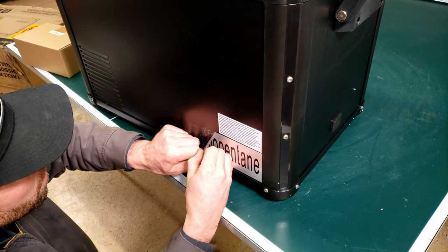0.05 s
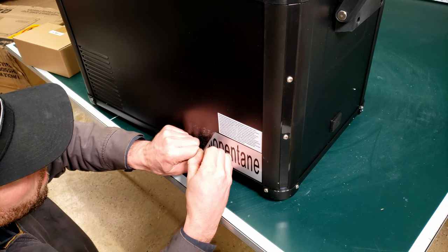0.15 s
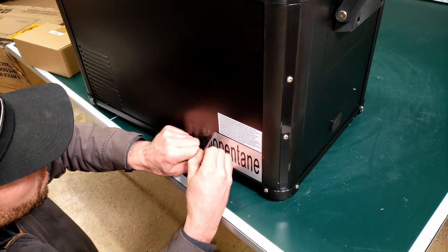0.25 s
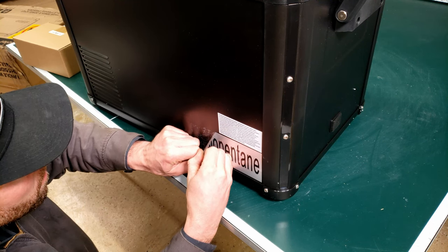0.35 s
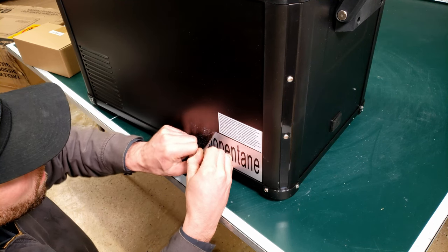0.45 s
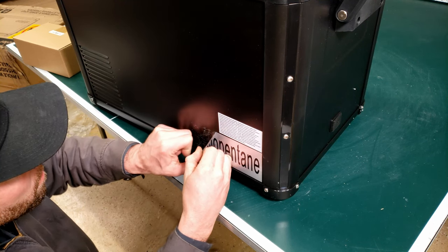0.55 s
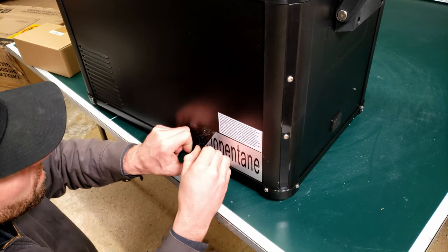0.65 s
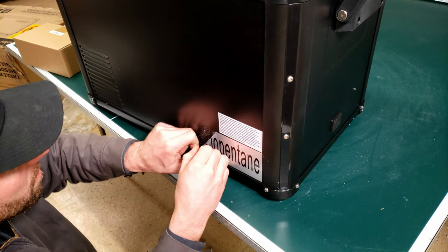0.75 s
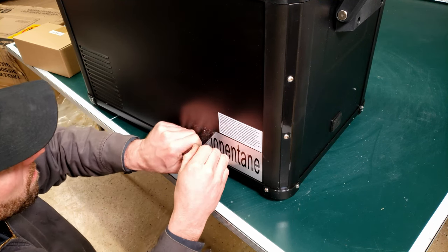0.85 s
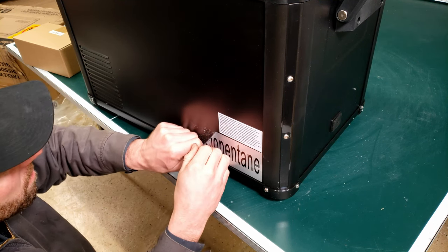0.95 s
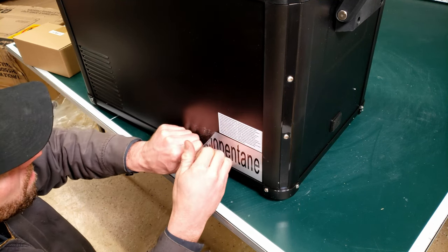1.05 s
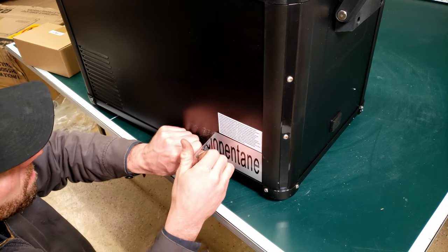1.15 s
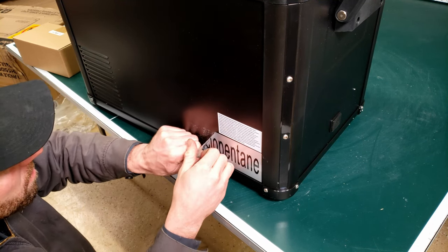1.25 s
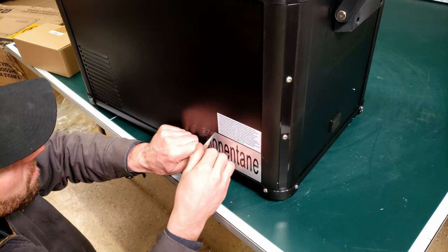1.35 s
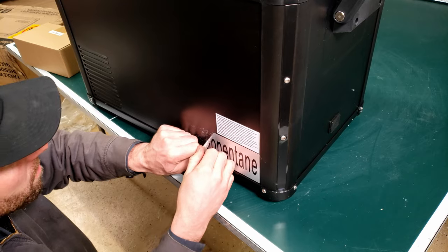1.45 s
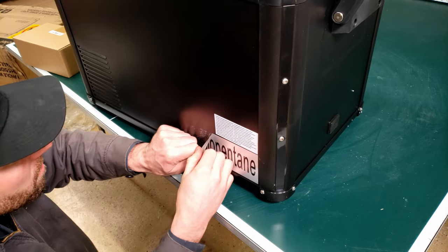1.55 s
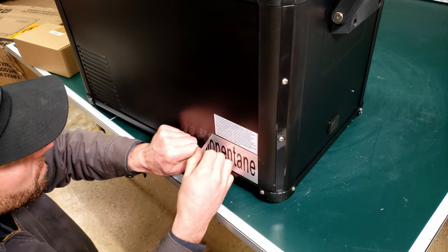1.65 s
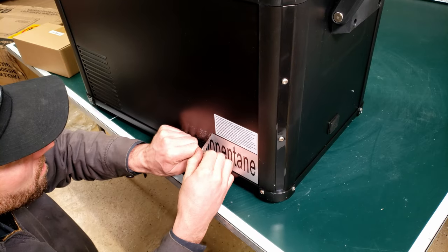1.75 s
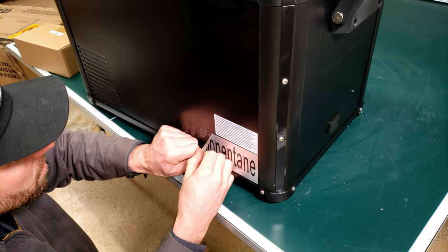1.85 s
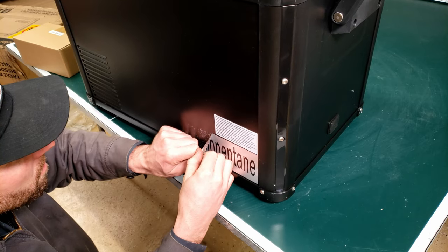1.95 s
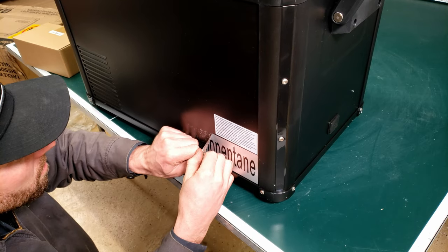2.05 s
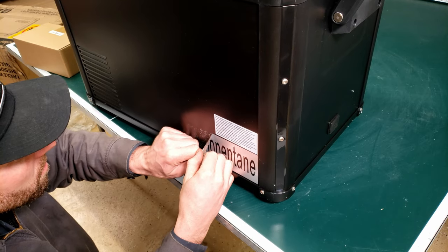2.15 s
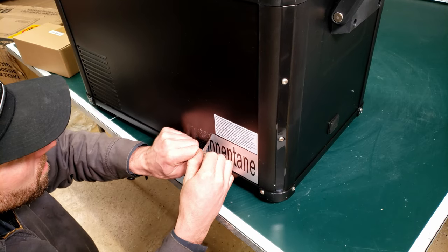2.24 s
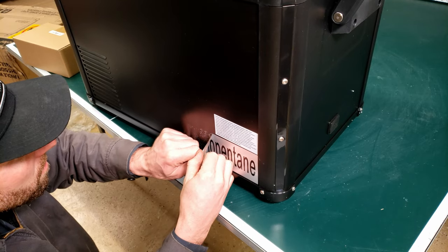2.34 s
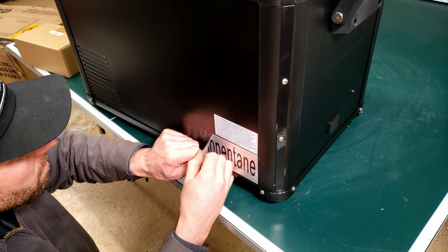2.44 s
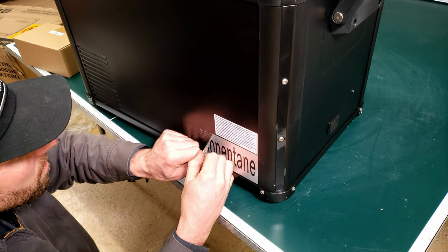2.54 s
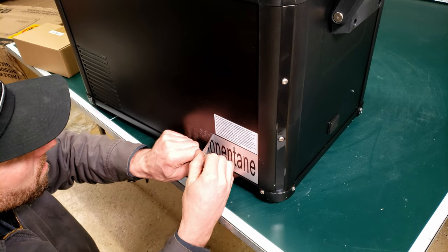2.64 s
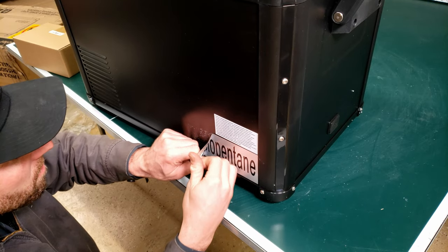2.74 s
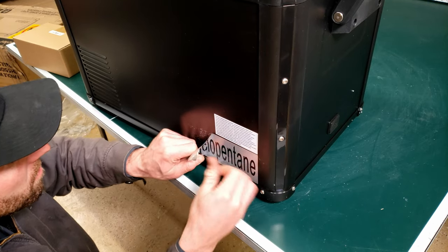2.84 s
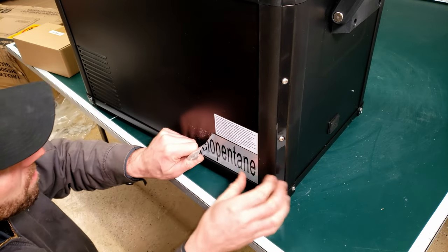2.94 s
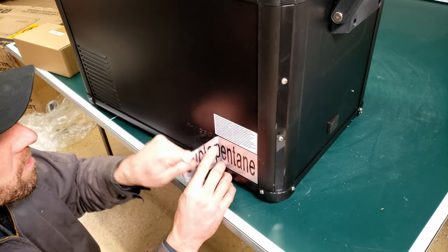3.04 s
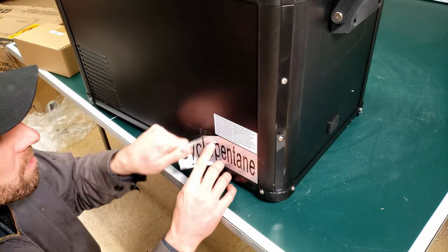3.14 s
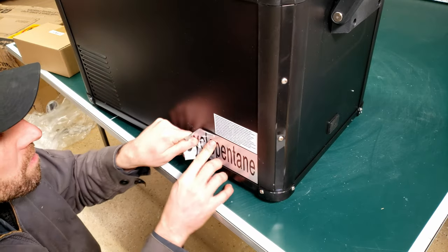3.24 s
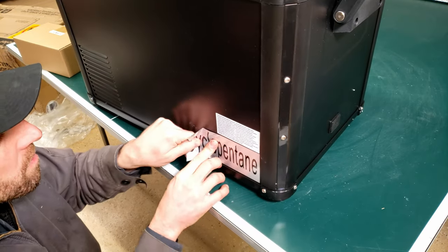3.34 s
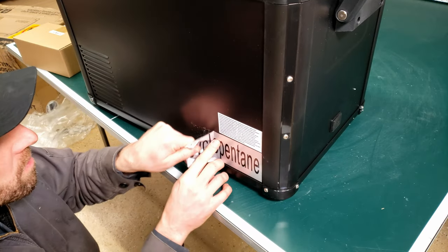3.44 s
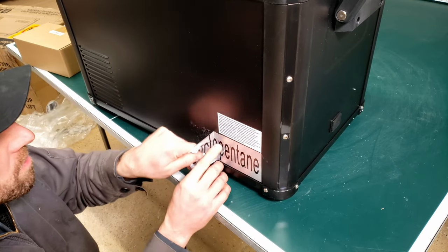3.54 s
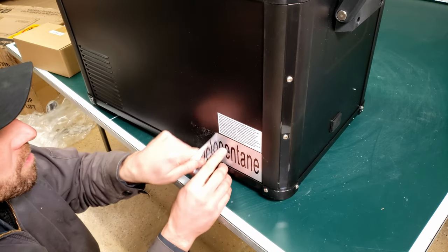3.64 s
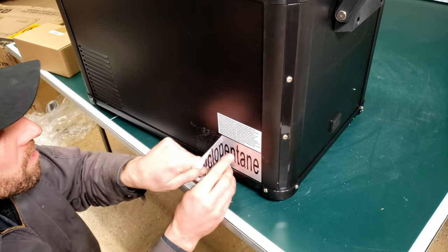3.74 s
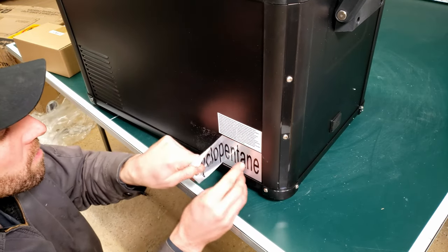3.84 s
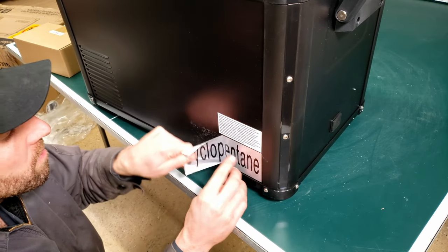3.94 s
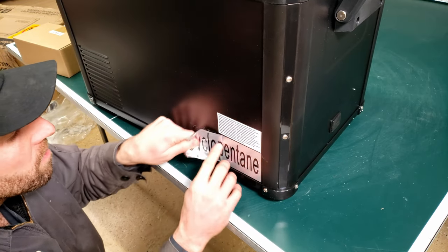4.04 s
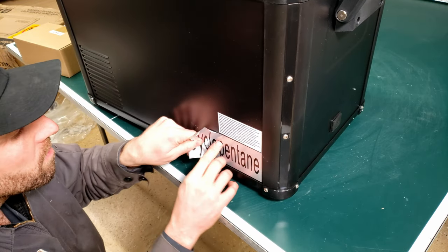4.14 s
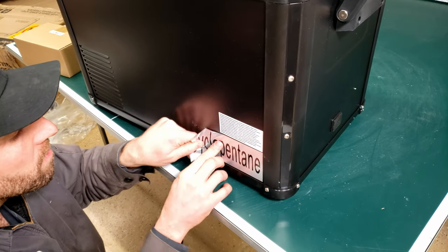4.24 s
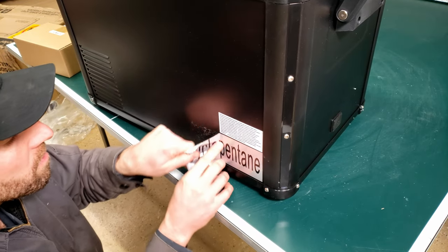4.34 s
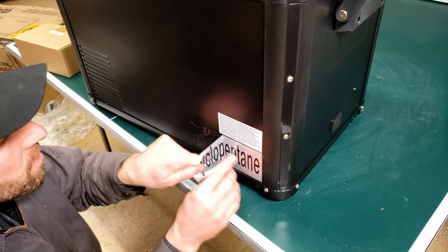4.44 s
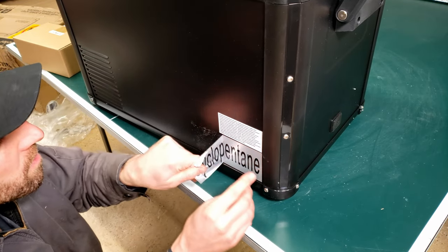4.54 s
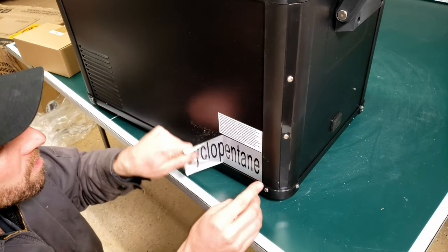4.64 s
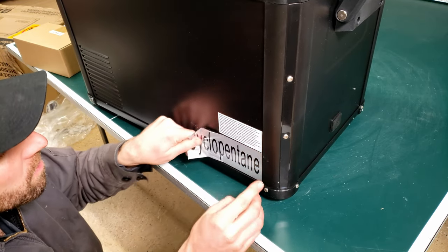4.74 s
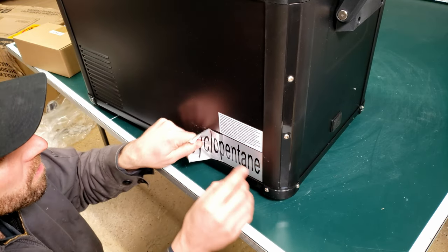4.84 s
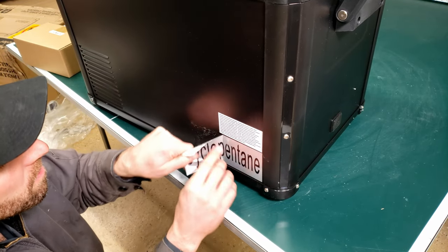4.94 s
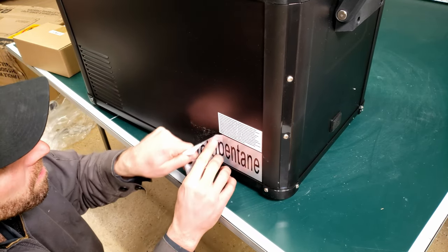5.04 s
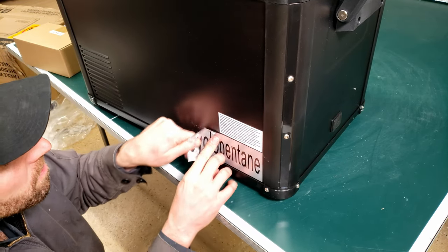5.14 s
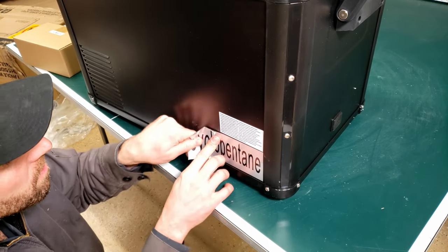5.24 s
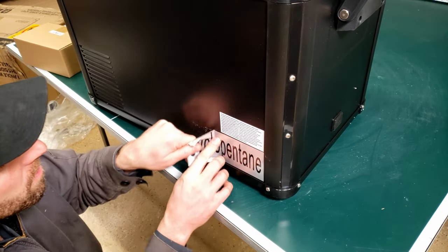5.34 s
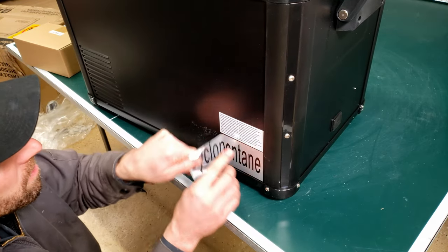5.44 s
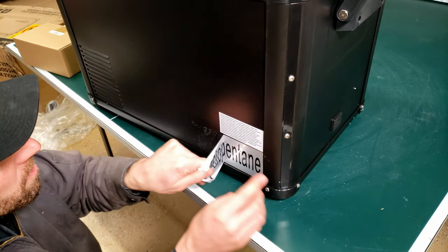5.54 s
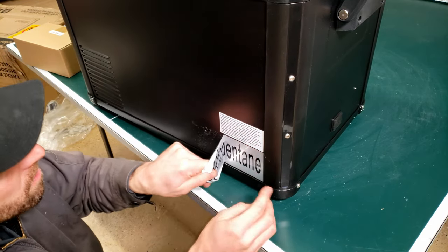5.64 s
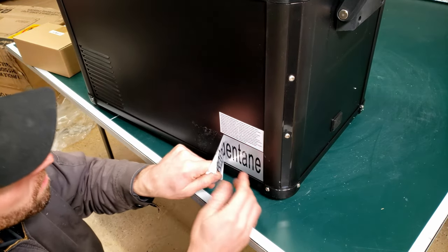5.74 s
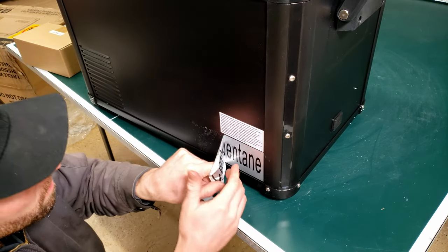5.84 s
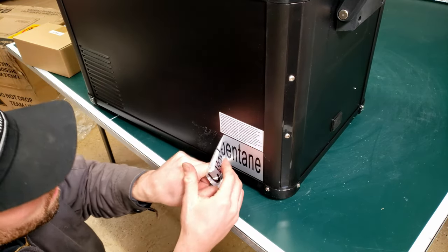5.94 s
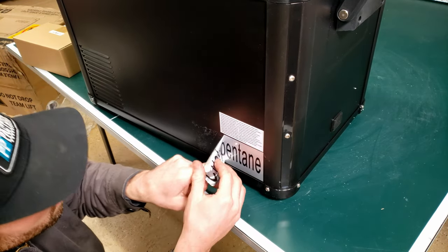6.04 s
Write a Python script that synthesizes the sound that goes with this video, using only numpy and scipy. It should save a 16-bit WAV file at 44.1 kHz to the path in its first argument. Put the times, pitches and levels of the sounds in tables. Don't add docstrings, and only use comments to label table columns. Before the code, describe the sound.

A plastic sticker is picked and torn off a small metal fridge in crackling snaps and short rips, with quiet gaps and faint hum.

```python
import sys
import numpy as np
from scipy import signal
from scipy.fft import rfft, irfft, next_fast_len
from scipy.io import wavfile

SR = 44100
rng = np.random.default_rng(int(sys.argv[2]) if len(sys.argv) > 2 else 0)


def natural_amplitude(level_db):
    exponent = np.asarray(level_db, float) / 20
    return 10 ** exponent


def wav_out(sig):
    wavfile.write(sys.argv[1], SR, np.round(np.clip(np.atleast_2d(sig).T, -1, 1) * 32767).astype(np.int16))


N = 268304


def rms_one(x):
    return x / np.sqrt(np.mean(x ** 2) + 1e-20)


def at_hz(points, hz):
    table_hz, values = np.array(points).T
    return np.interp(np.log(np.maximum(hz, 1)), np.log(table_hz), values)


def band(x, low_hz, high_hz):
    edges_hz = [low_hz, min(high_hz, .45 * SR)]
    return signal.sosfilt(signal.butter(2, edges_hz, "band", fs=SR, output="sos"), x)


def resonance(x, hz, width_hz):
    r = np.exp(-np.pi * width_hz / SR)
    poles = [1, -2 * r * np.cos(2 * np.pi * hz / SR), r * r]
    return signal.lfilter([(1 - r * r) / 2, 0, (r * r - 1) / 2], poles, x)


def shaped(x, gain):
    size = next_fast_len(x.shape[-1] + 4096)
    hz = np.arange(size // 2 + 1) * SR / size
    return irfft(rfft(x, size) * gain(hz), size)[..., :x.shape[-1]]


def drift(rate):
    r = np.exp(-2 * np.pi * rate / SR)
    return rms_one(signal.lfilter([1], [1, -2 * r, r * r], rng.standard_normal(N + SR))[SR:])


def stroke(start, rise, fall, rise_db, fall_db, in_s, out_s):
    t = np.arange(N) / SR - start
    on = np.clip(t / in_s, 0, 1) * np.clip((rise + fall - t) / out_s, 0, 1)
    span = on > 0
    on[span] *= natural_amplitude(np.interp(t[span], [0, rise, rise + fall], [-rise_db, 0, -fall_db]))
    return on, np.clip(t / (rise + fall), 0, 1)


def two_ports(length):
    # frequency in Hz, share common to both ports.
    likeness = [(300, 0.73), (2000, 0.85), (5000, 0.71), (12000, 0.3)]
    alike = lambda hz: np.clip(at_hz(likeness, hz), 0, 1)
    mid, side = rng.standard_normal((2, length))
    mid = shaped(mid, lambda hz: np.sqrt((1 + alike(hz)) / 2))
    side = shaped(side, lambda hz: np.sqrt((1 - alike(hz)) / 2))
    return np.array([mid + side, mid - side])


def breaks(per_s, spread_db, clump_db):
    born = rng.random(N) < per_s * natural_amplitude(clump_db * drift(60)) / SR
    return born * natural_amplitude(spread_db * np.minimum(rng.exponential(1, N), 4))


def grains(per_s, spread_db, clump_db, smooth_db):
    fade = np.exp(-1 / (0.00021 * SR))
    puffs = rms_one(signal.lfilter([1], [1, -fade], breaks(per_s, spread_db, clump_db) + 1e-18))
    return (puffs + natural_amplitude(smooth_db)) * two_ports(N)


def panel(x, ring_db):
    # frequency in Hz, width in Hz, level in dB.
    panel_modes = [(389, 14, -4), (480, 45, -0.5), (550, 52, -3), (615.7, 32, 5.5), (861, 79, -2),
                   (965, 38, 2.5), (1171, 34, -2), (1315, 55, 0), (1523, 69, -1), (1680, 45, 0.5)]
    pull = x.mean(axis=0)
    ring = 0
    for k, (hz, width_hz, db) in enumerate(panel_modes):
        ring = ring + (-1) ** k * natural_amplitude(db) * resonance(pull, hz, width_hz)
    return natural_amplitude(ring_db) * ring


def background():
    # frequency in Hz, rms level in dB.
    hum_lines = [
        (360.2, -73.5),
        (119, -88.5),
        (241, -92),
    ]
    # frequency in Hz, density in dB per Hz.
    rumble_density = [(20, -32), (40, -19.5), (65, -4), (110, -20), (170, -13), (250, -17.5), (500, -18.5),
                      (1000, -31.5), (2000, -35), (4000, -45)]
    rumble_db, hiss_db = -76, -80
    balance = natural_amplitude(np.array([[1.5], [-1.5]]))
    t = np.arange(N) / SR
    hum = 0
    for hz, db in hum_lines:
        hum = hum + np.sqrt(2) * natural_amplitude(db + 0.67 * drift(7.5)) * np.sin(2 * np.pi * hz * t)
    mid, side = rng.standard_normal((2, N))
    air = np.array([mid + .45 * side, mid - .45 * side]) * balance
    rumble = rms_one(shaped(air, lambda hz: natural_amplitude(at_hz(rumble_density, hz))))
    return hum * balance + natural_amplitude(rumble_db) * rumble + natural_amplitude(hiss_db) * rng.standard_normal((2, N))


def room(x):
    # frequency in Hz, 60 dB decay in s.
    decay_times = [(200, 0.13), (400, 0.24), (700, 0.37), (2000, 0.31), (5000, 0.33), (9000, 0.28),
                   (14000, 0.19)]
    # frequency in Hz, level against the direct sound in dB.
    echo_levels = [(200, -5.5), (400, -3), (700, -3), (2000, -2), (5000, -2), (14000, -6)]
    t = np.arange(SR // 2) / SR
    edges_hz = 100 * 2 ** np.arange(0, 7.6, .5)
    white = rng.standard_normal((2, 3, 2, len(t)))
    echo = 0
    for k, (low, high) in enumerate(zip(edges_hz, edges_hz[1:])):
        centre_hz = np.sqrt(low * high)
        t60 = at_hz(decay_times, centre_hz)
        energy_one = np.sqrt(6 * np.log(10) / (t60 * SR))
        dying = band(white[k % 2], low, high) * natural_amplitude(-60 * t / t60)
        echo = echo + natural_amplitude(at_hz(echo_levels, centre_hz)) * energy_one * dying
    echo = echo * np.clip((t - .003) / 0.0015, 0, 1)
    phase = np.arange(N) / 1200 + np.arange(3)[:, None, None] / 3
    spot = np.cos(np.pi * phase) * np.sqrt(2 / 3)
    return signal.fftconvolve(x * spot, echo, axes=2).sum(axis=0)[:, :N]


def hands():
    # start in seconds, rise in seconds, fall in seconds, peak in dB, deep thump relative in dB.
    rubs = [(0.414, 0.073, 0.25, -65.5, -2), (.7, 0.072, 0.1, -69.5, -18.5), (.88, .01, 0.37, -73, -24.5),
            (1.25, 0.15, 0.28, -72, -5), (3.0, 0.1, 0.6, -74.5, -28), (3.288, 0.17, 0.24, -75.5, 4.5),
            (3.66, 0.032, 0.17, -48.5, -27), (3.88, 0.43, 0.069, -68.5, -25),
            (4.3, 0.19, 0.2, -66.5, -17.5), (4.66, 0.034, 0.13, -65, -22.5),
            (4.85, 0.097, 0.23, -69.5, -7.5), (5.422, 0.019, 0.19, -52, -32),
            (5.809, 0.011, 0.22, -67.5, -26), (1.5, 0.091, .08, -79, -16.5)]
    murmur = rms_one(band(band(rng.standard_normal(N), 130, 450), 60, 800)) * natural_amplitude(3.5 * drift(20))
    mid, side = band(rng.standard_normal((2, N)), 50, 110)
    deep = rms_one(np.array([mid + 0.54 * side, mid - .45 * side]))
    out = 0
    for start, rise, fall, db, deep_db in rubs:
        on, _ = stroke(start, rise, fall, rise_db=9.5, fall_db=10.5, in_s=0.01, out_s=0.25)
        out = out + on * natural_amplitude(db + 6.5) * (murmur + natural_amplitude(deep_db - 1.5) * deep)
    return out


def bumps():
    # start in seconds, peak in dB, ring frequency in Hz.
    pushes = [
        (3.385, -58, 172),
        (3.467, -58.5, 165.3),
        (3.675, -48.5, 195),
        (4.101, -45.5, 182),
        (4.412, -41.5, 172.4),
        (5.227, -48, 176),
        (5.438, -48.5, 188),
    ]
    t = np.arange(8820) / SR
    swell_and_decay = (1 - np.exp(-t / 0.0033)) * np.exp(-t / 0.026)
    out = np.zeros(N + 8820)
    for s, db, hz in pushes:
        turn = 2 * np.pi * np.cumsum(hz * (.93 + 0.62 * np.exp(-t / 0.0051))) / SR
        ring = np.sin(turn) + 0.38 * np.sin(2 * turn)
        out[round(s * SR):][:8820] += natural_amplitude(db + 2.5) * ring * swell_and_decay
    return out[:N]


def booms():
    # start in seconds, peak in dB, frequency in Hz, decay in seconds.
    wall_booms = [(3.709, -36, 392, .04), (3.689, -34, 616, .02), (5.813, -56, 535, .022),
                  (1.267, -60.5, 455, .022), (1.371, -53, 805, .016), (2.656, -60, 985, .016),
                  (3.388, -51, 181, .032), (3.479, -53.5, 171, .022), (4.396, -35, 612, .028),
                  (5.448, -32, 616, .018), (4.036, -59, 212, .028), (3.506, -61, 722, .028),
                  (2.965, -60, 560, .025), (1.545, -64, 180, .03), (4.413, -32, 950, .012),
                  (1.425, -58, 900, .025)]
    second_ratio, second_share, rise_s = 1.11, 0.53, 0.0036
    t = np.arange(13230) / SR
    out = np.zeros(N + 13230)
    for s, db, hz, decay in wall_booms:
        pair = np.sin(2 * np.pi * hz * t) + second_share * np.sin(2 * np.pi * hz * second_ratio * t)
        out[round(s * SR):][:13230] += natural_amplitude(db) * pair * (1 - np.exp(-t / rise_s)) * np.exp(-t / decay)
    return out[:N]


def creeping():
    # time in seconds, crackle in dB, crackle centre in Hz,
    # hollow tick relative in dB.
    creep_pulls = [
        [(0.0, -61, 3270, -20), (0.388, -74, 4900, -31), (0.45, -62, 5840, -14)],
        [(1.46, -64.5, 5420, -12.5), (1.578, -63.5, 6700, -38), (1.86, -64, 4900, -19),
         (1.97, -64.5, 4300, -16), (2.298, -63.5, 3210, -5.5), (2.65, -63, 3090, -23)],
    ]
    pocket_hz = 1530
    t = np.arange(N) / SR
    rows = np.concatenate(creep_pulls)
    db, centre_hz, hollow_db = (np.interp(t, rows[:, 0], column) for column in rows[:, 1:].T)
    on = 0
    for pull in creep_pulls:
        first_s, last_s = pull[0][0], pull[-1][0]
        on = on + np.clip((t - first_s) / 0.093 + 1, 0, 1) * np.clip((last_s - t) / 0.048, 0, 1)

    fine = grains(per_s=580, spread_db=-0.5, clump_db=3.5, smooth_db=3.5)
    dealt = rng.integers(0, 10, N // 24 + 1).repeat(24)[:N]
    crackle = 0
    for k, hz in enumerate(np.geomspace(2400, 7400, 10)):
        near = natural_amplitude(-np.minimum(12.0 * np.log2(hz / centre_hz) ** 2, 12.0))
        crackle = crackle + near * resonance(fine * (dealt == k), hz, .12 * hz) / np.sqrt(hz)
    rustle = rms_one(band(fine, 5200, 11000))
    crackle = band(rms_one(crackle) + natural_amplitude(-3.5) * rustle, 3000, 7600)
    crackle = crackle - 0.61 * resonance(crackle, 4420, 700)

    ticks = grains(per_s=70, spread_db=2, clump_db=3, smooth_db=-3)
    hollow = band(resonance(resonance(ticks, pocket_hz, 420), pocket_hz, 600), 1250, 1900)
    fizz = band(band(fine, 11000, 17000), 9200, 17000)
    mix = rms_one(crackle) + natural_amplitude(hollow_db) * rms_one(hollow) + natural_amplitude(1.5) * rms_one(fizz)
    return on * natural_amplitude(db - 0.5) * mix


def peeling():
    # start in seconds, rise in seconds, fall in seconds, peak in dB,
    # brightness in dB.
    rip_pulls = [(.537, 0.052, 0.02, -38.5, -1), (1.05, 0.014, 0.036, -49.5, -3),
                 (2.957, 0.0053, 0.13, -53.5, -9), (3.47, 0.0093, 0.019, -50, -4.5),
                 (3.666, 0.024, 0.032, -27, -2), (4.205, 0.0033, 0.038, -61, -2),
                 (4.368, 0.041, 0.035, -31.5, 0.5), (4.42, .005, 0.04, -43, -1.5),
                 (.49, 0.026, .02, -46.5, -3.5), (5.437, .022, 0.029, -27, -0.5),
                 (2.698, 0.034, 0.045, -45, -4), (4.872, 0.04, 0.038, -48.5, -3),
                 (4.922, 0.0042, 0.04, -48, -3.5), (1.352, .035, .05, -50, -9)]
    swell_pulls = [(.458, 0.027, 0.07, -43.5, 0), (2.64, 0.042, 0.034, -54.5, 2.5),
                   (2.93, 0.012, 0.0025, -64.5, 9.5), (3.11, 0.047, 0.043, -52, -2),
                   (3.345, 0.059, 0.042, -48.5, 3), (3.63, 0.029, 0.01, -64, 3.5),
                   (3.9, 0.14, 0.023, -55.5, 4), (4.283, 0.091, 0.0027, -34, 3.5),
                   (4.668, 0.021, 0.05, -51, -1.5), (4.83, 0.042, 0.0092, -54.5, -9),
                   (5.1, 0.057, 0.052, -63, 2), (5.33, 0.1, 0.0058, -48, 0.5), (5.797, 0.027, 0.12, -64, 1)]
    rustle_pulls = [
        (.893, 0.036, 0.21, -68.5, 2.4),
        (1.25, 0.015, 0.081, -69.5, 7.1),
        (3.52, 0.0074, 0.19, -74, 11),
        (5.05, 0.009, 0.12, -70, 4.6),
        (5.975, 0.014, 0.22, -70, 9.2),
        (3.2, .01, 0.31, -79, 7),
    ]
    # rise in dB, fall in dB, panel ring in dB, glue in dB, top fizz relative in dB,
    # brightness lost over the pull in dB.
    rip_kind = (3.4, 3.8, 0.56, 8.6, 6.8, 2.2)
    swell_kind = (25.5, 2.5, -2, 4.5, 5, 9.5)
    rustle_kind = (8.7, 26, 22.3, 4.5, 1.8, 0.1)
    kinds = [(rip_pulls, rip_kind), (swell_pulls, swell_kind), (rustle_pulls, rustle_kind)]

    tear = grains(per_s=1100, spread_db=0.5, clump_db=2.5, smooth_db=-2)
    tug = band(tear, 400, 1600)
    film = band(tear, 1400, 2900)
    glue = band(tear + 0.64 * resonance(tear, 6860, 700), 3400, 9000)
    fizz = band(band(tear, 10000, 17000), 9000, 25000)
    levels = np.zeros((4, N))
    for pulls, (rise_db, fall_db, ring_db, glue_db, fizz_db, dulls_db) in kinds:
        for start, rise, fall, db, bright_db in pulls:
            on, done = stroke(start, rise, fall, rise_db, fall_db, in_s=0.0023, out_s=0.59 * fall)
            span = on > 0
            bright = bright_db + dulls_db * (.5 - done[span])
            tug_db = ring_db - 0.42 * bright + 0.35 * (db + 42.0)
            parts_db = np.array([tug_db, 0 * bright, glue_db + bright, fizz_db + bright])
            levels[:, span] += on[span] * natural_amplitude(db - 7.5 + parts_db)
    parts = [tug, film, glue, fizz]
    tug, *airborne = [level * rms_one(part) for level, part in zip(levels, parts)]
    return natural_amplitude(-4.5) * tug + panel(tug, 2.1) + sum(airborne)


def snaps():
    # start in seconds, peak in dB, bright crack relative in dB.
    panel_snaps = [(.5177, -30.5, -3.5), (5.838, -47.5, -5), (1.071, -34.5, 4), (1.1585, -48, -4),
                   (3.644, -58.5, 16), (3.6672, -24, -0.5), (3.6744, -27, -9), (3.6841, -27, -2),
                   (3.8879, -51.5, 9), (4.0078, -50, 13), (4.3085, -40, 0), (4.316, -30, 3),
                   (4.372, -24.5, 4), (4.3838, -24.5, 11), (4.3955, -36, 7), (4.418, -21, 4.5),
                   (5.4388, -15, 6.5), (5.4468, -23, 16), (.8945, -57.5, -22), (.9285, -49, -24),
                   (.969, -55, -14), (1.004, -62, -16), (1.354, -55, -4), (1.378, -48.5, -21.5),
                   (5.812, -63, -23), (5.83, -59, -23), (2.659, -60, -5.5), (3.0745, -48.5, -14),
                   (3.6765, -30.5, 6), (3.729, -33.5, 3.5), (4.4055, -18.5, 7.5), (4.944, -48, -2),
                   (4.99, -43.5, 7.5), (5.535, -49, -0.5), (5.504, -46, 3), (3.695, -25, 1),
                   (2.7402, -36, -5), (2.69, -54, -5), (4.4255, -29, -3), (4.46, -36, -5)]
    pocket_snaps = [(.5024, -27, -1), (.5586, -16, 0.5), (1.0418, -51, -40), (1.056, -39.5, -3),
                    (1.2616, -59, 7.5), (2.2214, -50.5, 12), (2.305, -51, -1), (2.393, -58, -8),
                    (6.008, -49, -11), (2.537, -61, -29), (3.0692, -48.5, -10), (3.1517, -58, 16),
                    (3.1702, -54, 8), (3.9575, -52.5, 7.5), (5.3938, -40.5, 2), (5.3969, -46.5, 14),
                    (5.4318, -19.5, 9), (5.4557, -13, 7), (1.015, -60.5, -18), (.531, -34, 2),
                    (.6005, -32, -6), (.6105, -41, -6), (1.887, -64, -10), (1.93, -63, -10),
                    (2.055, -61, -5), (3.081, -59, -15), (3.193, -45.5, -2), (4.767, -57.5, -1.5),
                    (4.8755, -48, 1), (5.379, -51.5, -6), (5.5125, -35, 3), (5.556, -39, -5),
                    (3.4205, -39, 0), (2.7398, -31, 0), (2.277, -50, -8), (.454, -56, -8), (.408, -62, -8)]
    flap_snaps = [(.4833, -38, 5), (.4916, -32.5, 2.5), (.5736, -13.5, -8), (.5827, -14.5, -6),
                  (1.2668, -56, 2), (1.4001, -34.5, 0.5), (1.4024, -32.5, -3), (2.2767, -40, -3),
                  (2.4083, -46.5, -6), (2.71, -34, -2), (2.9508, -61, 6), (2.9556, -54, -6),
                  (3.2513, -55, -4), (3.3197, -63, 0), (3.4135, -41.5, 1.5), (3.4555, -49.5, -3.5),
                  (3.4778, -34, 6.5), (3.7133, -22.5, -7), (4.2835, -46, -0.5), (4.3385, -37, 6.5),
                  (4.3517, -26, -4), (4.7077, -48, 2), (4.7233, -46, 2), (4.8354, -58.5, 2),
                  (4.8932, -41.5, -2), (5.4735, -20.5, 4), (.5565, -22, 0), (.569, -25, -4), (.58, -21, -4),
                  (.596, -26, -5), (4.043, -50.5, -3), (5.4333, -21, 6), (5.4472, -19, 3),
                  (5.4685, -22.5, -3), (4.3818, -23.5, 4), (4.3624, -26, -2), (3.6895, -28, 1.5),
                  (2.716, -36, 1), (4.206, -56.5, -2.5), (4.877, -44, 0), (4.883, -44, 0), (4.9, -43, 0),
                  (4.907, -42, 0), (4.914, -43, 0), (4.9245, -36, 0), (5.046, -60, -4), (5.086, -58, -4)]
    film_snaps = [(.0337, -45.5, 6), (.347, -49.5, 5), (.4666, -44.5, 7.5), (.9215, -57, -7),
                  (.5516, -18.5, -4), (1.5626, -55, 20), (1.8953, -34.5, -5.5), (1.9505, -43.5, 1),
                  (2.3382, -47, -4), (2.6612, -45, -5), (2.7139, -32, -4), (2.74, -27, 2),
                  (3.0008, -45, 11), (3.1234, -45.5, -3), (3.1404, -42.5, 5.5), (3.3774, -37, -1),
                  (4.2134, -45, -14), (4.2914, -34.5, 0), (4.8593, -45, -12.5), (5.1618, -48, 8),
                  (5.369, -46.5, -19.5), (5.9591, -43.5, -2.5), (.1, -54, 1), (.153, -51, 4),
                  (.196, -56, 8), (.296, -51.5, 1), (.38, -56.5, 4), (1.686, -52.5, -13),
                  (1.724, -59.5, -8), (2.463, -49, 0), (2.652, -47, 4), (2.7275, -36, -8),
                  (2.745, -47, -3.5), (4.3675, -29.5, 1.5), (4.3918, -20, 0), (4.6975, -42, -2),
                  (4.848, -58, -10.5), (4.87, -51.5, -15), (5.545, -42, -6), (.525, -26, 3),
                  (.0045, -45.5, 2), (.0107, -52, 1.5), (.0462, -60, -4.5), (.1762, -57, -1.5),
                  (.407, -61, 3), (.413, -55, 0), (1.2503, -63, 8), (1.3614, -54.5, -1.5),
                  (1.5714, -62, 8.5), (1.7373, -51.5, -4.5), (1.7707, -56.5, -4.5), (1.7948, -61, -6),
                  (2.1293, -56, -5), (2.2496, -54, -4.5), (2.357, -50, -3), (2.559, -54, -1),
                  (2.574, -56.5, -1), (3.1173, -61, 1), (4.4, -25.5, 3.5), (5.4593, -23, 3)]
    glue_snaps = [(.4452, -47.5, 10), (.4616, -34.5, 7.5), (1.4015, -25.5, -11), (.5132, -20.5, 2),
                  (.5383, -18, 2.5), (.545, -16, 1.5), (1.4965, -45, -31), (1.5842, -37, 2.5),
                  (2.681, -50, 6), (2.9599, -40.5, 3), (2.9749, -51, 14), (3.0085, -34.5, -18),
                  (3.0427, -36.5, 6), (3.349, -43.5, 7.5), (3.4732, -32, 3), (3.7015, -13, 6),
                  (4.3616, -24.5, 5), (4.3953, -21.5, -0.5), (4.4108, -20.5, 0.5), (4.6708, -47.5, 5),
                  (4.6823, -40, -1.5), (4.6941, -39.5, 4), (4.881, -40, -2), (4.9233, -27.5, 7),
                  (5.4573, -15, -3), (5.8164, -39, -9.5), (5.8382, -32.5, -1.5), (5.8815, -37.5, -8),
                  (5.99, -44.5, -10), (6.0721, -39, -0.5), (.473, -35.5, 1), (.5565, -28, 3.5),
                  (.564, -24, 9.5), (2.689, -47.5, 2), (4.398, -20.5, 1), (3.162, -43, 1.5),
                  (4.4167, -19, -3), (4.3465, -27.5, 0.5), (4.355, -34, 3), (4.3872, -20, 1.5),
                  (4.4053, -18.5, -3), (4.934, -36, 3), (4.8873, -40, 3.5), (5.463, -18, 8),
                  (5.482, -20.5, 7.5), (5.5843, -50.5, 10), (5.801, -54.5, -9.5), (5.807, -61, -10),
                  (5.8225, -58, 8), (5.9, -58, -8), (5.9965, -42.5, -5), (5.9995, -48, 4), (6.018, -63, 3),
                  (6.044, -62, 2), (6.0525, -60, 14), (6.063, -48, 2), (5.341, -57, 7.5), (5.417, -40, 8),
                  (2.9249, -60, 4), (5.1462, -59, -1.5), (5.2273, -61, 0), (4.6596, -61, 6)]
    pitched = [(panel_snaps, 930), (pocket_snaps, 1635), (flap_snaps, 2630), (film_snaps, 4200),
               (glue_snaps, 6800)]
    rise_s, burst_s, after_s, after_share = .0004, .0007, 0.0055, 0.15
    length = 882
    t = np.arange(length) / SR
    envelope = (1 - np.exp(-t / rise_s)) * (np.exp(-t / burst_s) + after_share * np.exp(-t / after_s))
    click = 2.2 * (t == 9 / SR)
    peak_one = lambda x: x / np.abs(x).max(axis=(1, 2), keepdims=True)
    spread_one = lambda x: x / x.std(axis=(1, 2), keepdims=True)
    out = np.zeros((2, N + length))
    for rows, hz in pitched:
        s, db, crack_db = np.transpose(rows)[..., None, None]
        noise = two_ports(len(rows) * length).reshape(2, len(rows), length).swapaxes(0, 1)
        puff = noise * envelope
        ring = spread_one(resonance(resonance(puff + click, hz, 0.35 * hz), hz, .8 * hz))
        broad_db = 3.5 + 0.43 * np.minimum(crack_db, 0) + .2 * np.minimum(db + 30.0, 0)
        body = ring + natural_amplitude(broad_db) * spread_one(band(puff, 0.47 * hz, 8900))
        crack = peak_one(band(puff, 8100, 17000))
        ones = natural_amplitude(db + 2.5) * (peak_one(body) + natural_amplitude(crack_db) * crack)
        for start, one in zip(np.round(s.ravel() * SR).astype(int), ones):
            out[:, start:start + length] += one
    out = out[:, :N]
    return out + panel(out, -14)


def scene():
    # frequency in Hz, phase by which left leads in radians.
    port_lead = [(200, 0), (2400, 0.67), (3400, 0.88), (4700, 1.67), (7000, 1.25), (15000, 2.5)]
    # frequency in Hz, left minus right in dB.
    port_balance = [(60, 2), (110, 1), (200, 6), (380, 2.5), (700, 3.5), (1290, 4), (2380, 1), (4400, 1),
                    (8120, 3), (15000, 0.5)]
    cracks = snaps()
    spread = peeling() + creeping()
    touch = bumps() + booms() + hands()
    dry = spread + cracks + touch
    sent = spread + touch + natural_amplitude(-4.5) * cracks
    ear = np.array([[.5], [-.5]])
    to_ports = lambda hz: natural_amplitude(ear * at_hz(port_balance, hz)) * np.exp(1j * ear * at_hz(port_lead, hz))
    direct = shaped(dry, to_ports)
    return direct + room(sent.mean(axis=0)) * natural_amplitude(ear * 0.7) + background()


def top_cut(x):
    return signal.sosfilt(signal.butter(12, 17120, fs=SR, output="sos"), x)


def record(dry):
    # frequency in Hz, gain in dB.
    colour = [(60, -4.5), (300, 0.5), (1000, 2), (2700, 4), (5200, 3.5), (6600, 2), (7500, -0.5),
              (8500, -3.5), (10500, 3.5), (13000, 5), (15500, 4)]
    cutoff_hz = 15800
    x = shaped(dry, lambda hz: natural_amplitude(at_hz(colour, hz)))
    x = .8 * np.tanh(x / .8)
    x = shaped(x, lambda hz: natural_amplitude(-45 * np.clip((hz - cutoff_hz) / 200, 0, 1)))
    return top_cut(x)


dry = scene()
out = record(dry)
wav_out(out)
```